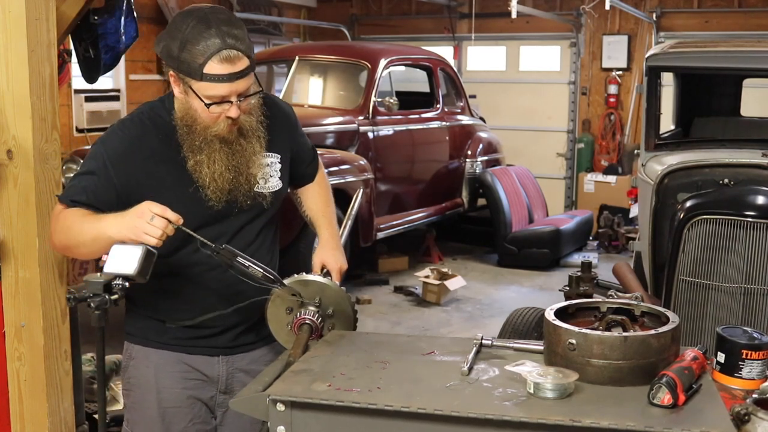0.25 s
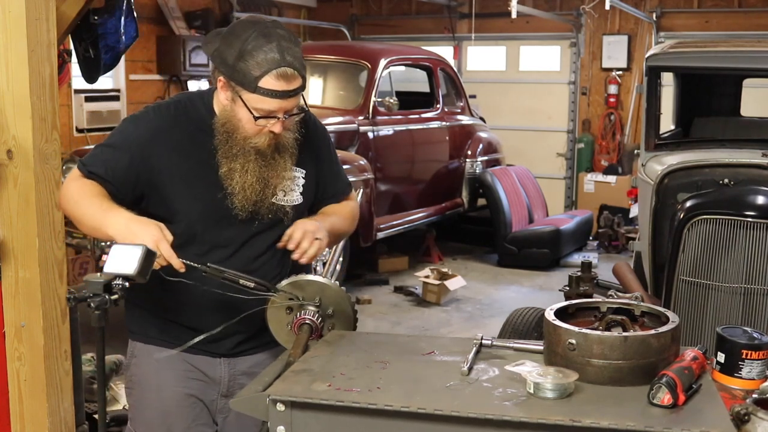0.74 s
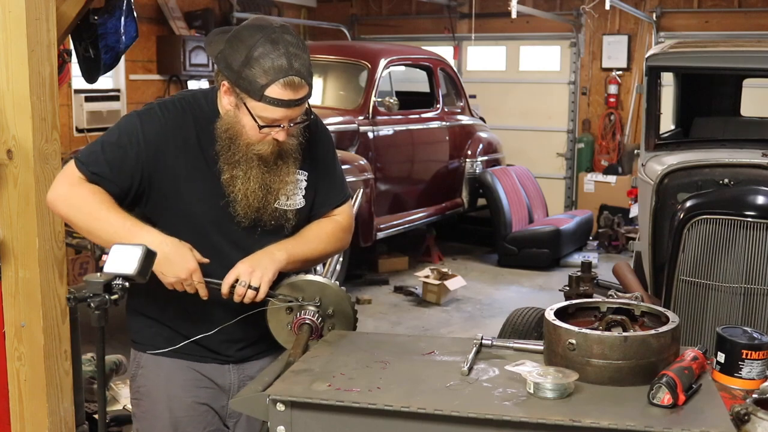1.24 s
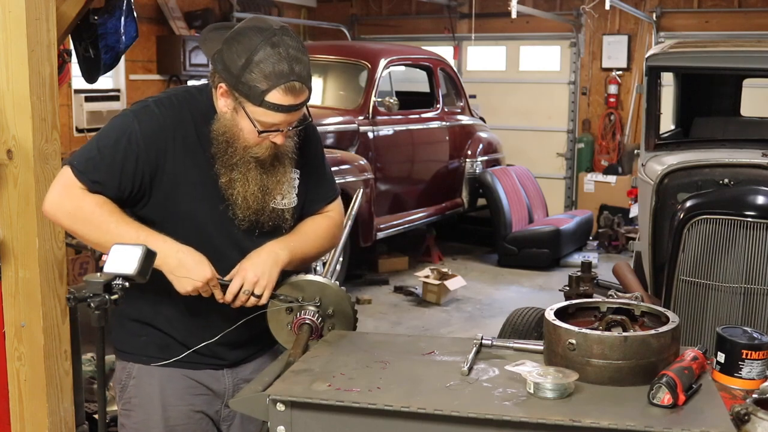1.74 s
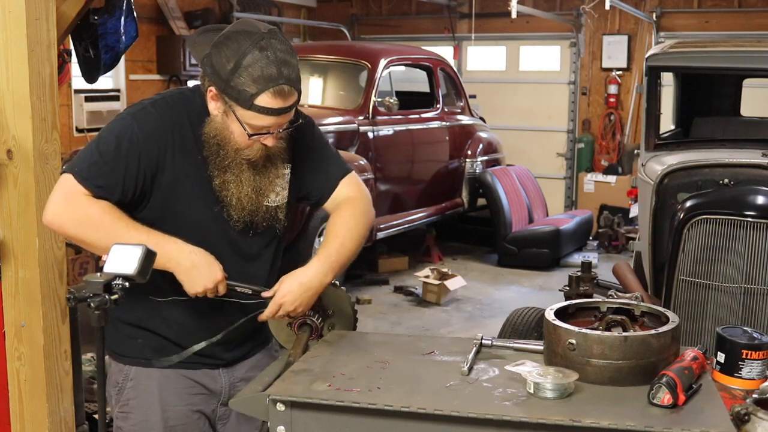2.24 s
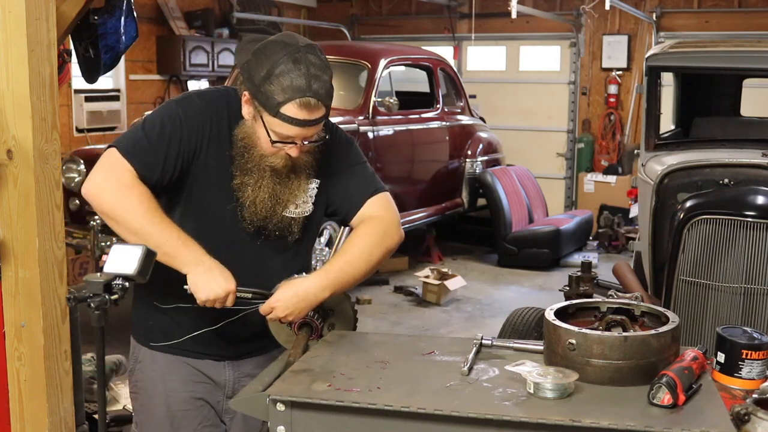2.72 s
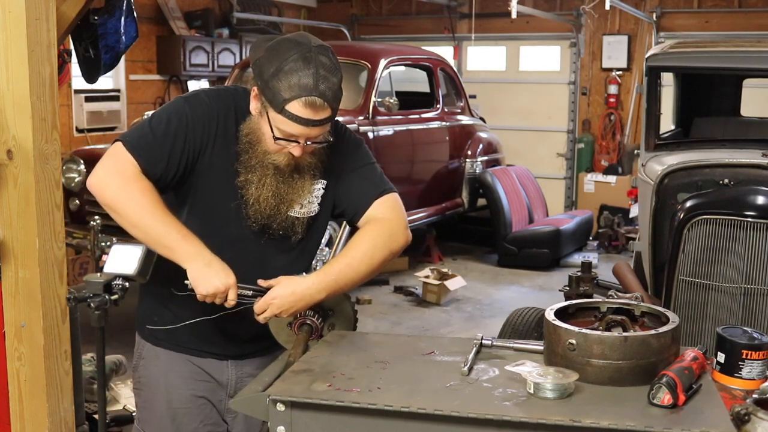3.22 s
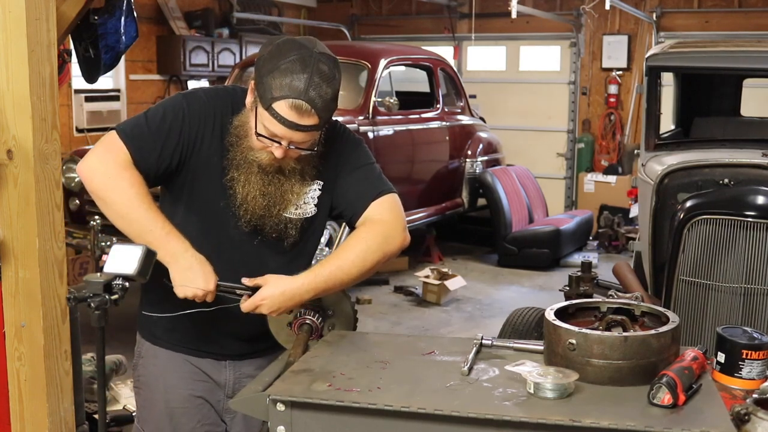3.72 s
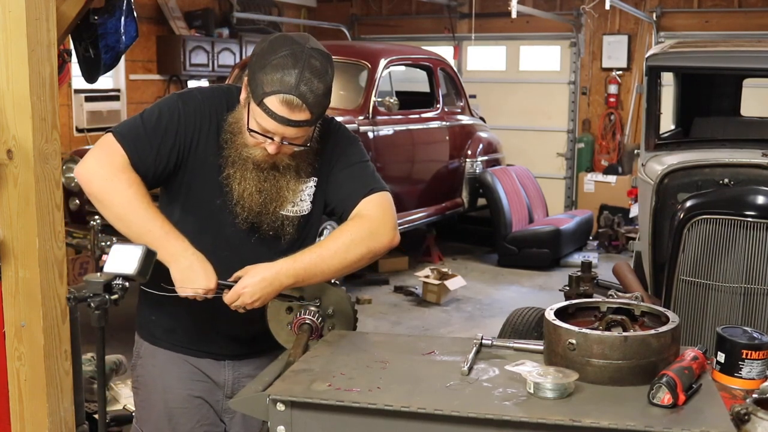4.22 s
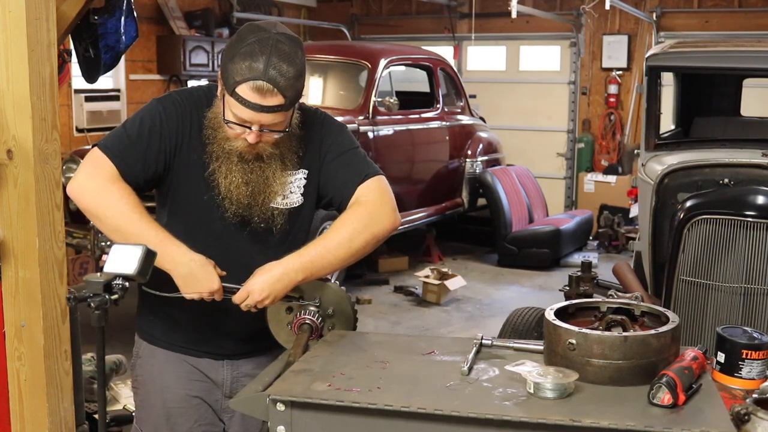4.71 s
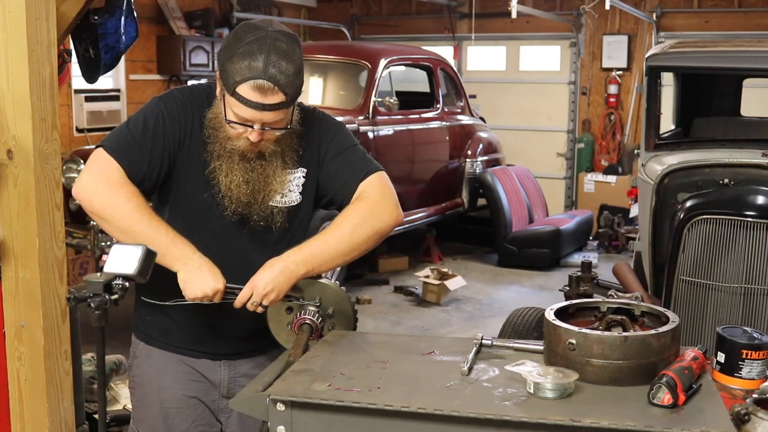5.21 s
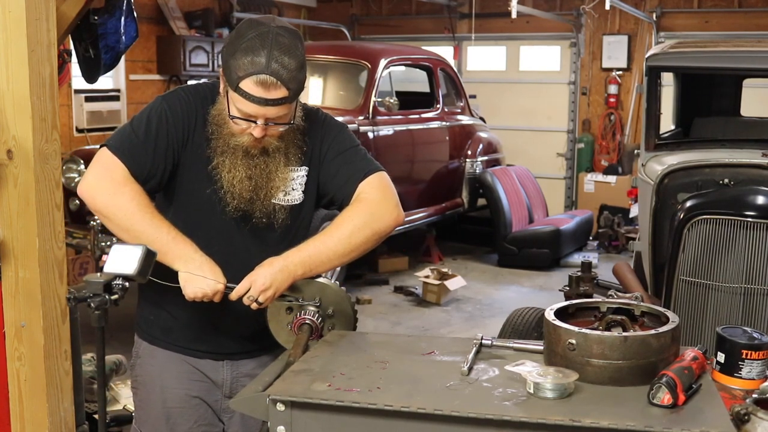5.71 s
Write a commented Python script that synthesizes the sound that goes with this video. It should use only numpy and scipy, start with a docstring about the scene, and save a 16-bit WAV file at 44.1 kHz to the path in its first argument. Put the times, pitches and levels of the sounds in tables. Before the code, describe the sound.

A quiet garage with low room noise and faint mains hum, heard in stereo from fairly close. At 0.2 s a small bright steel click comes with a soft hiss and a dull low boom from the tugged assembly. Fainter ticks follow at 0.5 and 0.85 s. At 1.1 s wire slides and clicks in the jaws, and at 1.17 s the pliers lock with one very loud, hard crack, bright and briefly ringing, with a deep boom below; the recording level ducks and recovers. Light ticks cluster around 1.6-1.8 s, with clicks at 2.1-2.55 s and faint cloth rustle. A tiny squeak leads into a broad, firm scrape at 2.8 s. Crisp clicks with low booms bunch at 3.35-3.5 s, then single ticks at 3.8, 4.2, 4.3, 4.55 and 4.85 s. Afterwards there is mostly hum and quiet handling, with a very faint boom near 5.7 s.

```python
"""Mains hum and room noise lie under it all; then a tug booms while wire clicks and slides in steel jaws.
In a garage, steel wire is clamped and twisted tight with lacing pliers on a brake assembly.
The pliers lock with one hard, ringing snap, and the recorder's limiter ducks after it.
Contacts are bursts of noise, rings are decaying sines, and rubbing is coloured noise with tiny catches.
One broad scuff comes midway; a stereo garage response surrounds the close sounds."""
import sys
import numpy as np
from scipy import signal
from scipy.fft import rfft, irfft
from scipy.io import wavfile

SR = 44100
rng = np.random.default_rng(int(sys.argv[2]) if len(sys.argv) > 2 else 0)


def store_pcm(level_fs):
    """Save levels as 16-bit WAV."""
    pcm = np.round(np.clip(level_fs, -1, 1) * 32767).astype(np.int16)
    wavfile.write(sys.argv[1], SR, np.atleast_2d(pcm).T)


N = 262614

# jaws and wire clicking: t/s, energy level/dB, body/dB, edge/dB, rattle length/s, wire ping f/Hz
CLICKS = [(0.1951, -7.5, -29, -4.5, 0.009, 3020), (0.534, -31.5, -15, 9, 0.0016, 9550),
          (0.8455, -16.5, 7.5, -1.5, 0.00098, 1257), (1.089, -8, 2, -2, .011, 1500),
          (1.6184, -21, 4, 4.5, .0015, 4520), (1.674, -20.5, -3, -1.5, .017, 4600),
          (1.738, -26, -10, 0, .006, 4460), (1.802, -20, -9, -4, 0.019, 3500),
          (2.0966, -22, -1, -18, 0.004, 5330), (2.265, -9.5, 1.5, -8.5, 0.0078, 1787),
          (2.37, -17, -15, 1.5, 0.0092, 4400), (2.4938, -15.5, -12, -2, 0.0093, 2920),
          (2.549, -18, -24, -2.5, 0.003, 5100), (3.349, -10.5, -16, -14, 0.0053, 2035),
          (3.358, -12, -23, -4, 0.0048, 4500), (3.413, -11, -29, 0.5, 0.017, 4500),
          (3.4723, -1, -14.5, -4, 0.0055, 2820), (3.757, -15.5, -16, -1, 0.0059, 6520),
          (3.801, -9, -34, -1.5, 0.0036, 6490), (4.216, -9.5, -15, -0.5, 0.0084, 6330),
          (4.3063, -3, -11.5, -11.5, 0.0054, 2056), (4.5482, -9, -16.5, -1.5, 0.0071, 4550),
          (4.837, -24.5, -11.5, -4.5, .006, 4400)]
# the pliers snapping shut: t/s, energy level/dB, body/dB, edge/dB, rattle length/s, ping f/Hz
SNAP = [(1.1706, 25.5, -12.5, 0, 0.0031, 2120)]
EDGES = 25 * 2 ** np.arange(0, 9.6, .5)  # half-octave band edges, Hz


def from_db(db):
    """Decibels to gain."""
    return 10 ** (np.asarray(db) / 20)


def rms_one(x):
    """Scale to rms 1."""
    return x / np.sqrt(np.mean(x ** 2) + 1e-20)


def energy_one(x):
    """Scale to unit energy, averaged over the channels."""
    return rms_one(x) / np.sqrt(x.shape[-1])


def at_hz(points, hz):
    """Read a curve on a log-frequency axis."""
    points = np.array(points)
    return np.interp(np.log(hz), np.log(points[:, 0]), points[:, 1])


def band(x, low_hz, high_hz, order=2):
    """Causal band-pass."""
    sos = signal.butter(order, [low_hz, min(high_hz, .45 * SR)], "band", fs=SR, output="sos")
    return signal.sosfilt(sos, x + 1e-18)


def ring(clicks, hz, t60):
    """A unit click sets a decaying sine of starting height 1 ringing."""
    radius = from_db(-60 / (t60 * SR))
    turn = 2 * np.pi * hz / SR
    return signal.lfilter([0, np.sin(turn)], [1, -2 * radius * np.cos(turn), radius ** 2], clicks + 1e-18)


def dying(t, t60):
    """Exponential decay by 60 dB in t60 seconds."""
    return np.exp(-np.log(1000) * t / t60)


def diffuse_bands(size):
    """Half-octave bands of stereo noise, alike at both microphones in the bass, unrelated in the treble."""
    # likeness of left and right: f/Hz, correlation
    likeness = [(30, .4), (70, 0.75), (140, 0.36), (380, .55), (700, 0.34), (1400, 0.15), (3000, 0.1),
                (15000, 0)]
    white = rng.standard_normal((2, 2, size))
    for k, (low, high) in enumerate(zip(EDGES, EDGES[1:])):
        mid, side = band(white[k % 2], low, high)
        hz = np.sqrt(low * high)
        alike = np.clip(at_hz(likeness, hz), -1, 1)
        yield hz, np.sqrt(1 + alike) * mid + np.sqrt(1 - alike) * side * np.array([[1], [-1]])


def background(air_db):
    """Steady room noise and mains hum, a touch louder at the left microphone."""
    # room noise: f/Hz, relative level/dB per Hz
    air_colour = [(15, -64), (25, -32.5), (70, -7), (102, -11.5), (141, -3), (206, -6), (242, -9.5),
                  (270, -6), (416, -13), (641, -12), (775, -15.5), (1890, -17.5), (2220, -27),
                  (2760, -18.5), (16000, -31)]
    # mains hum ahead of the left-right balance: f/Hz, level/dB rms
    hum_tones = [(120, -79.5), (240, -66.5)]
    air = sum(from_db(at_hz(air_colour, hz)) * noise for hz, noise in diffuse_bands(N))
    hum = np.zeros(N)
    for hz, db in hum_tones:
        turns = hz * np.arange(N) / SR + rng.random()
        hum += from_db(db) * np.sqrt(2) * np.sin(2 * np.pi * turns)
    balance = from_db(np.array([[.5], [-.5]]))
    return (from_db(air_db) * rms_one(air) + hum) * balance


def mounting(rest_hz, stretch, relax_s, swell_s, t60, low_hz, high_hz, loose_db, loose_t60):
    """A tug sets the assembly booming; pitch sinks as tension lets go, and loose parts rumble along."""
    # tugs on the mounting: t/s, level/dB
    tugs = [(0.192, -41), (0.492, -52.5), (1.194, -36), (2.13, -51), (2.4, -52.5), (3.341, -44),
            (3.471, -46), (4.31, -55.5), (5.669, -58)]
    out, t = np.zeros(N + SR), np.arange(SR) / SR
    turns = rest_hz * (t + stretch * relax_s * (1 - np.exp(-t / relax_s)))
    tone = np.sin(2 * np.pi * turns) * dying(t, t60)
    swell = 1 - np.exp(-t / swell_s)
    for s, db in tugs:
        rumble = rms_one(band(rng.standard_normal(SR), low_hz, high_hz))
        loose = from_db(loose_db) * rumble * dying(t, loose_t60)
        at = round(s * SR)
        out[at:at + SR] += from_db(db) * (tone + loose) * swell
    return out[:N]


def contacts(rows, body_hz, low_hz, high_hz, edge_hz, bass_db, top_db, ping_db, ping_width):
    """Each contact is a short, dense rattle of steel on steel with its own body, edge and ping."""
    out, t = np.zeros(N + SR), np.arange(SR // 10) / SR
    hz = np.maximum(np.fft.rfftfreq(len(t), 1 / SR), 1)
    for s, level_db, body_db, edge_db, length, ping_hz in rows:
        fade = np.exp(-t / max(length, 5e-4))
        rattle = rfft(rng.standard_normal(len(t)) * fade)
        colour = [(60, body_db + bass_db - 10.5), (500, body_db + bass_db), (body_hz, body_db),
                  (low_hz, 0), (high_hz, 0), (edge_hz, edge_db), (16000, edge_db + top_db)]
        # while the jaws touch it the wire is heavily damped, so its ping is a broad hump
        hump = np.exp(-(np.log(hz / ping_hz) / ping_width) ** 2)
        shape_db = at_hz(colour, hz) + ping_db * hump
        # keep only the phases of the rattle, and give it the wanted spectrum
        force = irfft(rattle / np.abs(rattle) * from_db(shape_db), len(t)) * np.sqrt(fade)
        at = round(s * SR)
        out[at:at + len(t)] += from_db(level_db) * energy_one(force)
    return out[:N]


def pliers(rows, ring_db, damping):
    """The steel rings on after each contact; a gripping hand shortens the ring."""
    # ringing modes of the pliers: f/Hz, relative level/dB, t60/s at damping 1
    modes = [(2832, -20, .15), (3320, -18, .05), (4089, -17, .15), (4292, -17, .1), (4480, -17, .06),
             (5476, -14, .1), (5581, -13, .25), (5680, -11, .05), (5836, -13, .12), (7690, -15, .06),
             (8120, -18, .08), (10136, -6, .06), (10276, -2, .2), (10320, -1, .2), (10420, -6, .04),
             (12510, -12, .04), (14848, -9, .05), (15105, -9, .025), (15338, -9, .02)]
    blows, out = np.zeros(N), np.zeros(N)
    for s, level_db, *_ in rows:
        blows[round(s * SR)] += from_db(level_db + ring_db)
    for k, (hz, db, t60) in enumerate(modes):
        sense = (-1) ** k  # neighbouring modes swing in opposite sense
        out += sense * from_db(db) * ring(blows, hz, t60 / damping) / np.sqrt(t60)
    return out


def wire(ring_db, t60):
    """Each click leaves the taut wire ringing faintly at its ping."""
    out, t = np.zeros(N + SR), np.arange(SR // 2) / SR
    for s, level_db, *_, ping_hz in CLICKS:
        at = round(s * SR)
        tone = np.sin(2 * np.pi * ping_hz * t) * dying(t, t60)
        out[at:at + len(t)] += from_db(level_db + ring_db) * energy_one(tone)
    return out[:N]


def small_radiator(x, corner_hz):
    """A thin steel tool radiates little bass."""
    return signal.sosfilt(signal.butter(2, corner_hz, "high", fs=SR, output="sos"), x + 1e-18)


def jaw_clicks():
    """Jaws and wire knock together, and both tool and wire ring on."""
    knocks = contacts(CLICKS, body_hz=1122, low_hz=2050, high_hz=4730, edge_hz=7000,
                      bass_db=-6, top_db=-4, ping_db=5, ping_width=0.1102)
    ringing = pliers(CLICKS, ring_db=-60.0, damping=0.97) + wire(ring_db=-15.5, t60=0.16)
    return small_radiator(knocks + ringing, corner_hz=777)


def friction(gain, colour, grains_per_s, grain_db):
    """Rubbing surfaces: a smooth hiss with tiny catches of uneven size."""
    grains = (rng.random((2, N)) < grains_per_s / SR) * rng.standard_normal((2, N))
    rough = rng.standard_normal((2, N)) + from_db(grain_db) * rms_one(grains)
    hiss = np.zeros(N)
    for k, (low, high) in enumerate(zip(EDGES, EDGES[1:])):
        hiss += from_db(at_hz(colour, np.sqrt(low * high))) * band(rough[k % 2], low, high)
    return gain * rms_one(hiss)


def stroke(at_s, level_db, build_s, hold_s, stop_s):
    """Gain of one swell of hiss: it builds up by range_db, holds, and falls by as much in stop_s."""
    range_db = 30
    t = np.arange(N) / SR - at_s
    before = np.maximum(-t, 0) / max(build_s, 1e-3)
    after = np.maximum(t - hold_s, 0) / max(stop_s, 1e-3)
    return from_db(level_db - range_db * np.minimum(before + after, 10))


def sliding():
    """A brief soft hiss leads into the first click, then wire drags through the jaws; the strongest rules."""
    # first the soft hiss, then pulls of the wire: t/s at full level, level/dB, build-up/s, hold/s
    swells = [(0.196, -47, .018, .008), (0.845, -54, 0.18, 0.016), (1.092, -36, 0.024, .008),
              (1.11, -40, .03, 0.036), (1.85, -62.5, 0.47, .2), (2.073, -53, 0.12, 0.047),
              (2.268, -46, 0.035, .002), (2.3, -57, .05, 0.027), (2.734, -59, 0.18, 0.044),
              (3.361, -47.5, 0.092, .003), (3.468, -44, .055, 0.0055)]
    # sliding hiss: f/Hz, relative level/dB per Hz
    slide_colour = [(200, -17), (450, -7.5), (1000, -4), (2000, -2), (4500, 1), (9000, 0), (16000, -11.5)]
    stop_s, rest_db = 0.12, -72.5  # between pulls the wire only grazes
    gain = np.max([stroke(*swell, stop_s) for swell in swells], axis=0) + from_db(rest_db)
    return friction(gain, slide_colour, grains_per_s=400, grain_db=5.0)


def sleeves():
    """Cloth rustles as the arms move; each movement swells and fades in a bell shape."""
    # arm movements: middle t/s, level/dB, half length/s
    reaches = [(1.14, -59, 0.14), (1.35, -62, 0.24), (2.122, -61.5, 0.067), (3.404, -70, 0.14),
               (4.247, -66, 0.13), (4.596, -59.5, .19)]
    # rustling cloth: f/Hz, relative level/dB per Hz
    rustle_colour = [(100, -31), (250, 1), (400, 4), (800, -13.5), (1500, -1.5), (2200, -5), (4000, -11),
                     (16000, -40)]
    rest_db = -72.5  # the hands are never quite still
    t = np.arange(N) / SR
    power = sum(from_db(db) ** 2 * np.exp(-((t - s) / half_s) ** 2) for s, db, half_s in reaches)
    gain = np.sqrt(power + from_db(rest_db) ** 2)
    return friction(gain, rustle_colour, grains_per_s=140, grain_db=-3.5)


def squeaks():
    """The wire squeaks in the jaws: stick and slip in a narrow resonance."""
    # squeaks: t/s, level/dB, f/Hz, hold/s
    squeak_rows = [(1.127, -48.5, 3230, .03), (2.741, -44.5, 2420, .003), (3.239, -54.5, 2660, 0.0034),
                   (3.725, -57, 2160, 0.0052)]
    build_s, stop_s = 0.0049, .015
    width = .1  # share of the pitch, each way
    slip, out = rng.standard_normal(N), np.zeros(N)
    for s, db, hz, hold_s in squeak_rows:
        tone = rms_one(band(slip, hz * (1 - width), hz * (1 + width)))
        out += stroke(s, db, build_s, hold_s, stop_s) * tone
    return out


def pliers_snap():
    """The pliers lock with a hard crack and ring in the gripping hand."""
    crack = contacts(SNAP, body_hz=1170, low_hz=2100, high_hz=4500, edge_hz=9000,
                     bass_db=7, top_db=4.5, ping_db=2.0, ping_width=0.14)
    return small_radiator(crack + pliers(SNAP, ring_db=-37.5, damping=2.0), corner_hz=1500)


def low_thump(level_db, fade_s):
    """A short dull low thump under the snap, as when a recorder is overloaded: one decaying pulse."""
    t = np.arange(N) / SR - SNAP[0][0]
    return from_db(level_db) * (t >= 0) * np.exp(-np.abs(t) / fade_s)


def scuff():
    """A broad scrape: a light touch leads into one firm stroke."""
    # scraping: f/Hz, relative level/dB per Hz
    scuff_colour = [(90, -38.5), (170, -13), (380, -6), (680, -2), (1300, 1), (2800, 4), (4500, -0.5),
                    (8000, -4.5), (14000, -13.5), (16000, -17)]
    at_s, stop_s = 2.8038, 0.12
    touch = stroke(at_s, level_db=-39.5, build_s=0.15, hold_s=0, stop_s=stop_s)
    firm = stroke(at_s, level_db=-28.5, build_s=0.029, hold_s=0.067, stop_s=stop_s)
    return friction(np.maximum(touch, firm), scuff_colour, grains_per_s=780, grain_db=-3)


def garage(x, near_db, near_t60, bench_s, bench_db, bench_t60, tail_db, build_s):
    """Direct sound, scatter off things nearby, an echo off the cluttered bench, then the room's tail."""
    # decay of the garage: f/Hz, t60/s
    garage_t60 = [(150, 0.29), (700, 0.5), (2000, 0.38), (5000, 0.56), (9000, 0.47), (15000, 0.22)]
    right_lag_s = 6e-5  # the right microphone is a little farther away
    t = np.arange(SR) / SR
    scatter = sum(noise for hz, noise in diffuse_bands(SR))
    near = energy_one(scatter * dying(t, near_t60))
    bench_decay = (t >= bench_s) * dying(np.abs(t - bench_s), bench_t60)
    bench = energy_one(scatter[:, ::-1] * bench_decay)
    tail = sum(noise * dying(t, at_hz(garage_t60, hz)) for hz, noise in diffuse_bands(SR))
    tail = energy_one(tail * (1 - np.exp(-t / build_s)))
    direct = np.sinc((t - np.array([[0], [right_lag_s]])) * SR)
    response = direct + from_db(near_db) * near + from_db(bench_db) * bench + from_db(tail_db) * tail
    return signal.fftconvolve(x[None], energy_one(response), axes=1)[:, :N]


def scene():
    """Tool, wire, sleeves and scuff sound in the garage, over the boom, the low thump and the hum."""
    close = jaw_clicks() + sliding() + sleeves() + squeaks() + pliers_snap() + scuff()
    room = garage(close, near_db=2.5, near_t60=0.1, bench_s=0.0055, bench_db=1.5, bench_t60=0.0096,
                  tail_db=0.0, build_s=.008)
    boom = mounting(rest_hz=136.3, stretch=.33, relax_s=0.023, swell_s=0.014, t60=0.67,
                    low_hz=125, high_hz=177, loose_db=-8.5, loose_t60=0.57)
    return room + boom + low_thump(level_db=-21, fade_s=0.00039) + background(air_db=-61)


def limiter(x, threshold_db, attack_s, release_db_per_s):
    """The gain drops within milliseconds of a loud peak and climbs back steadily."""
    over = np.maximum(20 * np.log10(np.abs(x).max(axis=0) + 1e-9) - threshold_db, 0)
    climb = release_db_per_s * np.arange(N) / SR
    held = np.maximum.accumulate(over + climb) - climb
    r = np.exp(-1 / (attack_s * SR))
    return x * from_db(-signal.lfilter([1 - r], [1, -r], held))


def record(dry):
    """The recorder limits, clips what peaks remain, and cuts off the top."""
    limited = limiter(dry, threshold_db=-4.0, attack_s=.008, release_db_per_s=112)
    clipped = np.clip(limited, -1, 1)
    low_pass = signal.cheby2(20, 70, 16650, fs=SR, output="sos")  # order, stopband dB, stopband edge Hz
    return signal.sosfilt(low_pass, clipped)


dry = scene()
out = record(dry)
store_pcm(out)
```